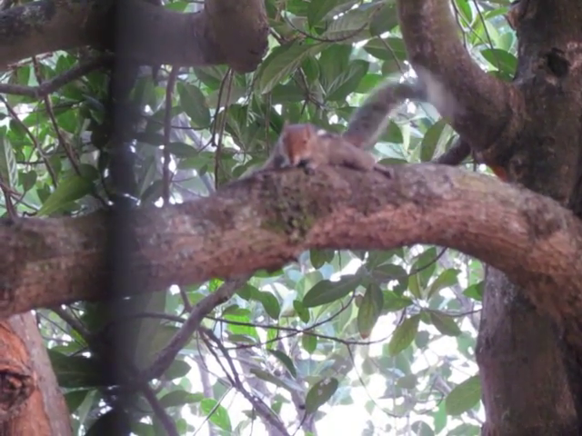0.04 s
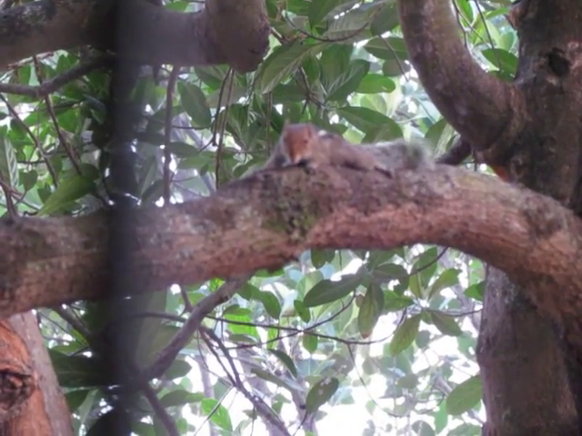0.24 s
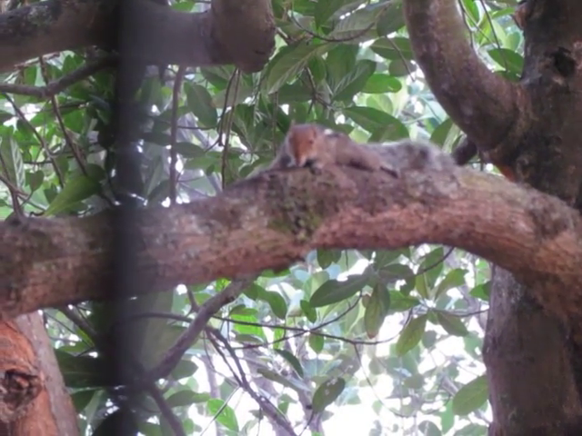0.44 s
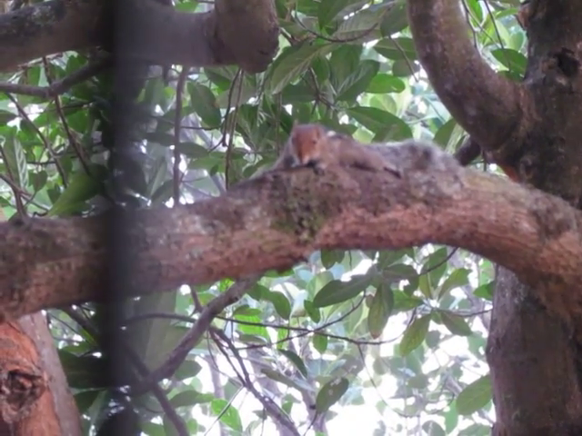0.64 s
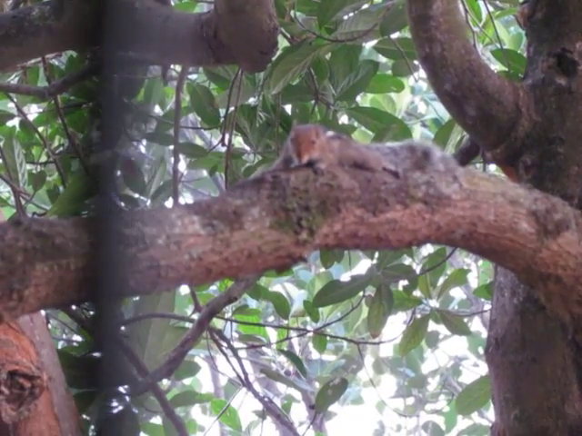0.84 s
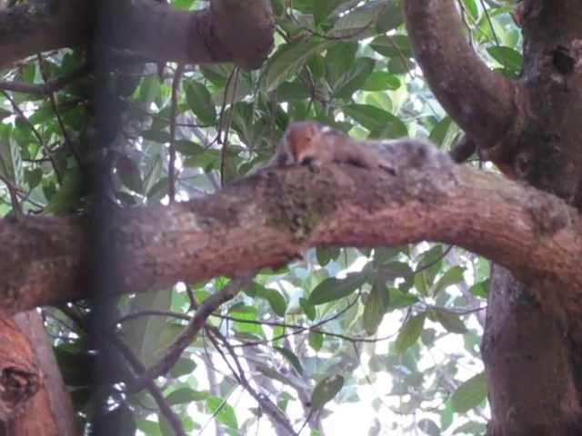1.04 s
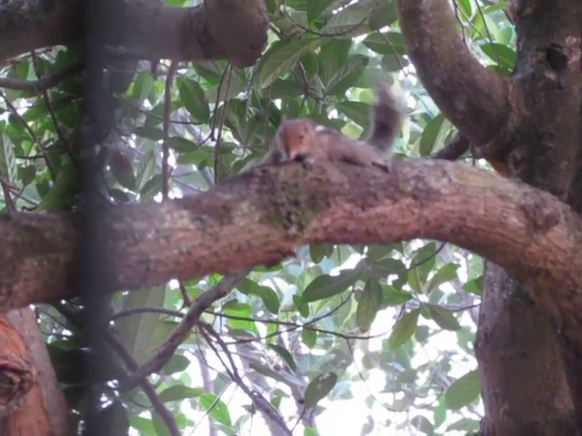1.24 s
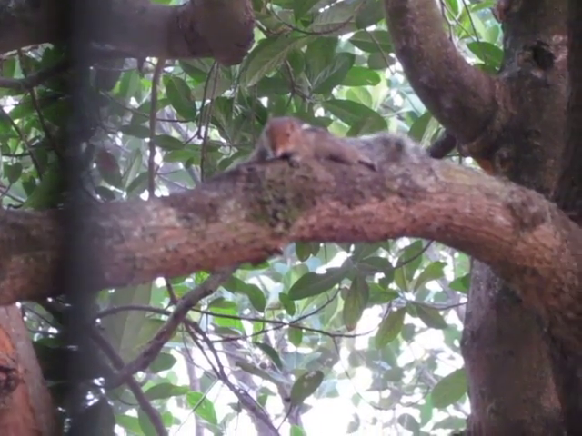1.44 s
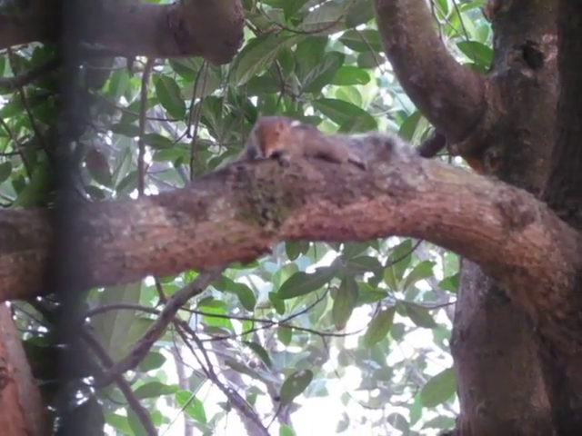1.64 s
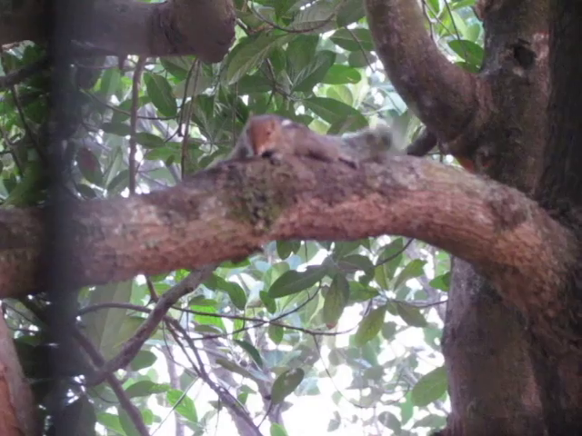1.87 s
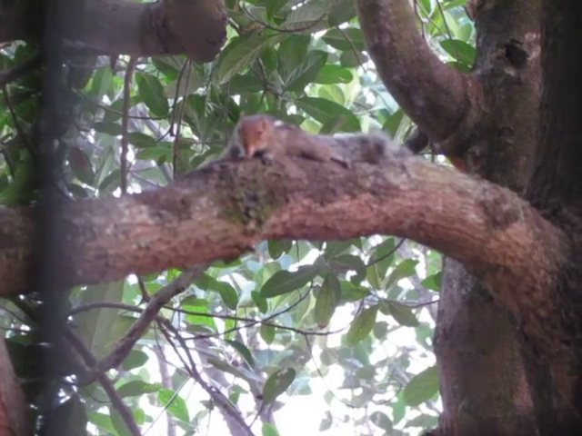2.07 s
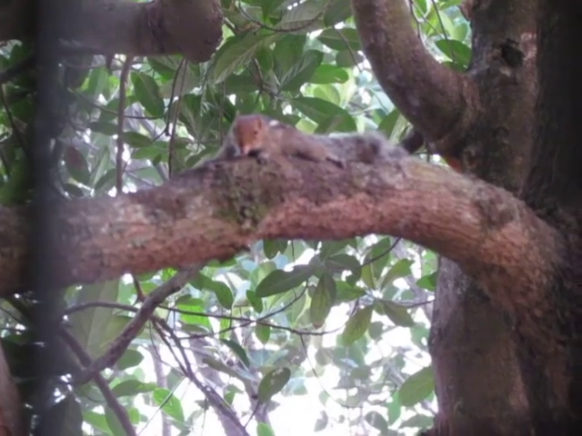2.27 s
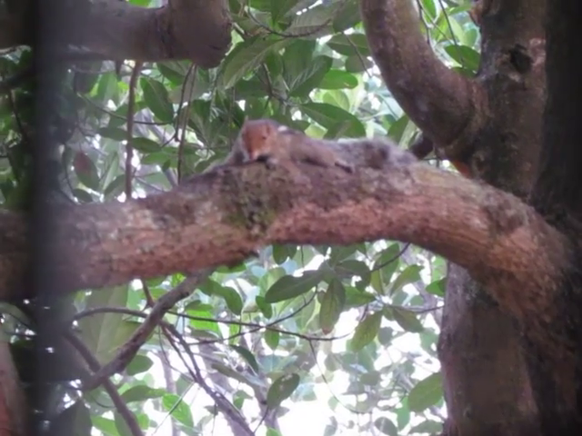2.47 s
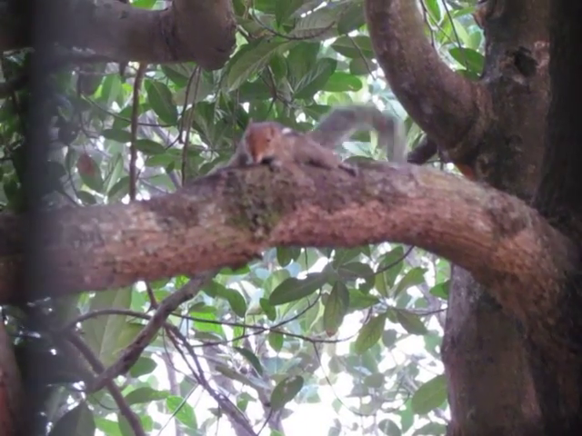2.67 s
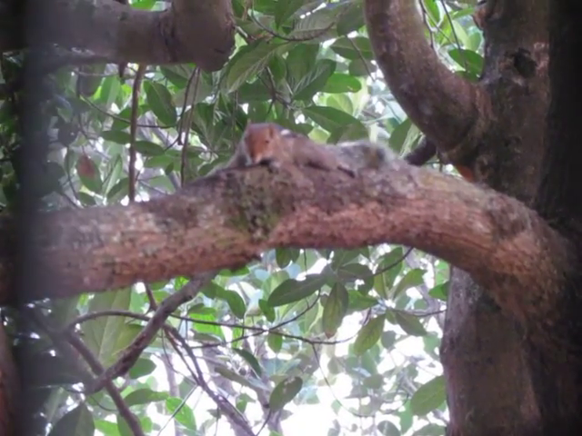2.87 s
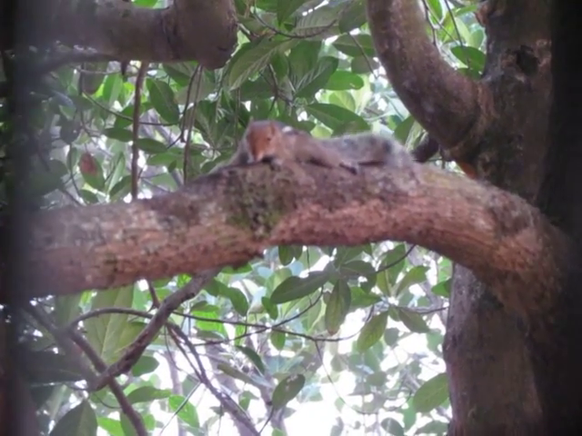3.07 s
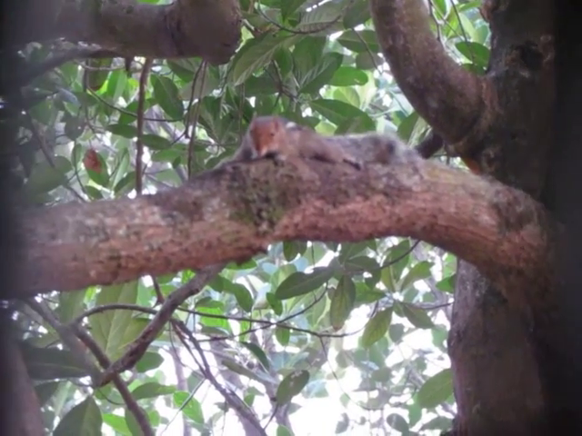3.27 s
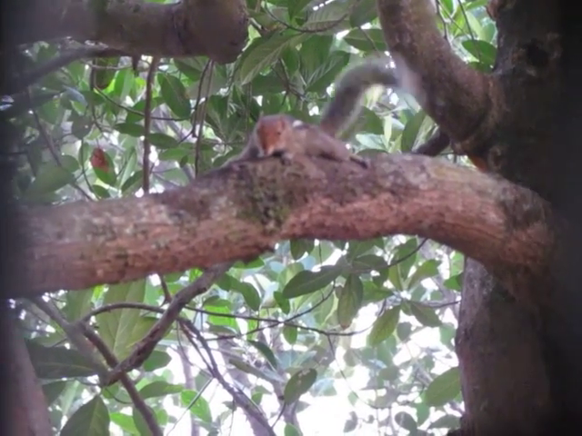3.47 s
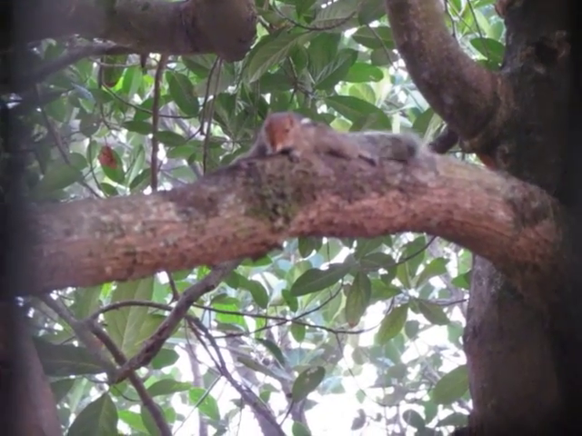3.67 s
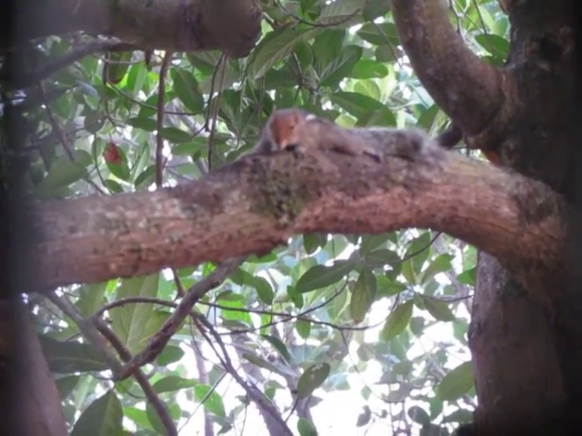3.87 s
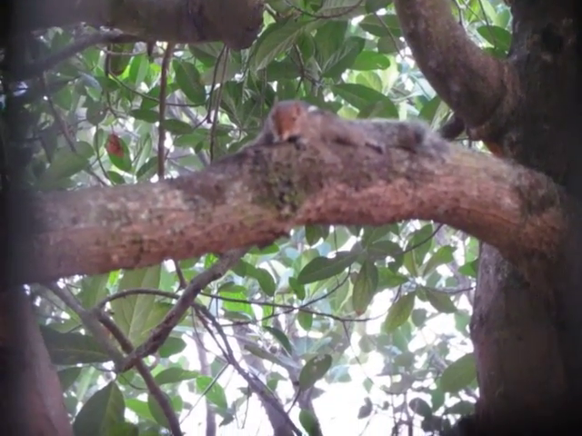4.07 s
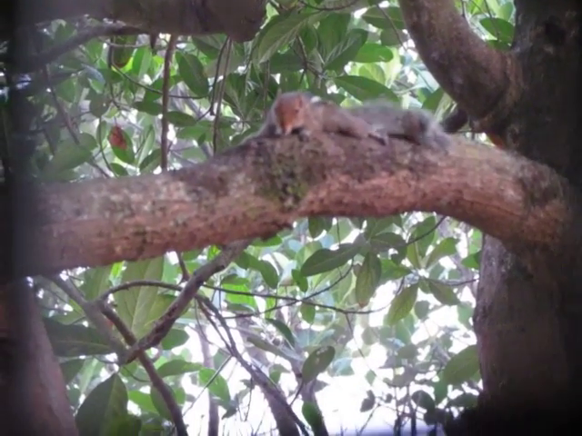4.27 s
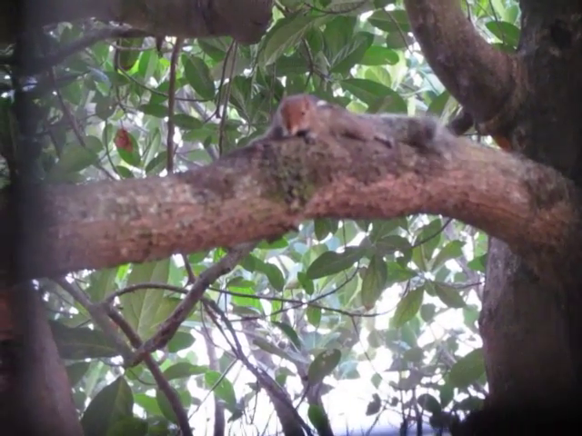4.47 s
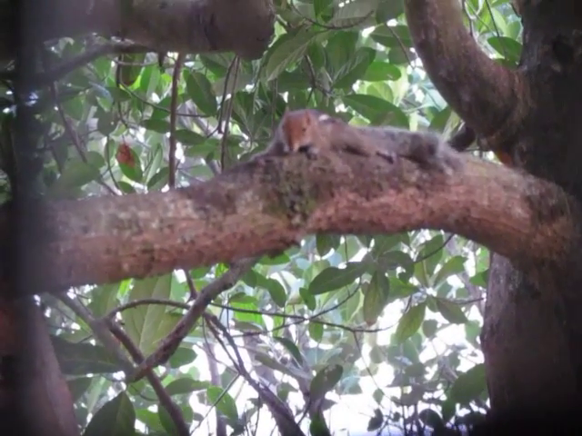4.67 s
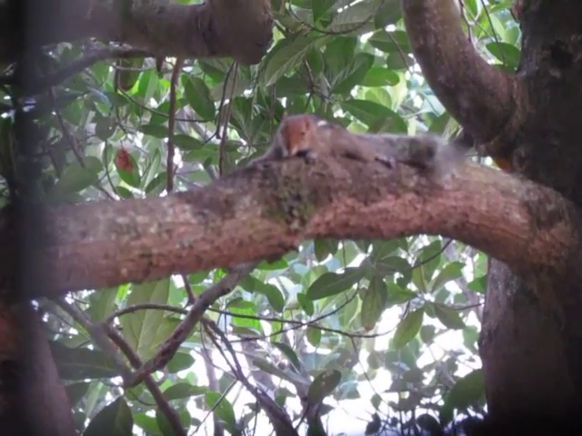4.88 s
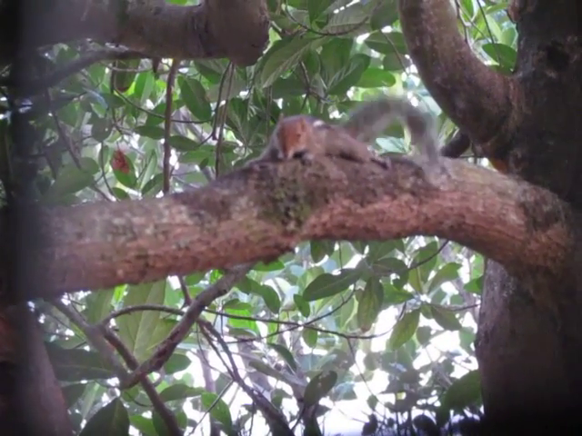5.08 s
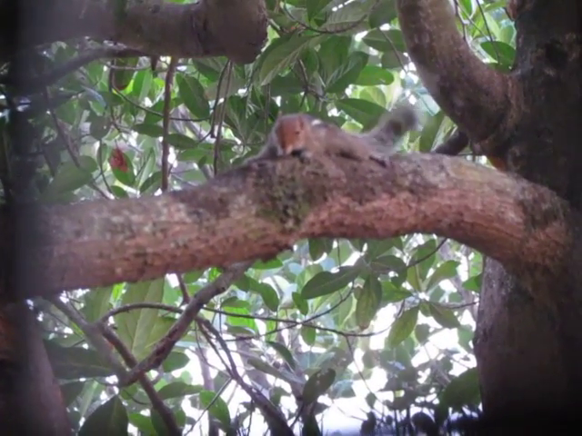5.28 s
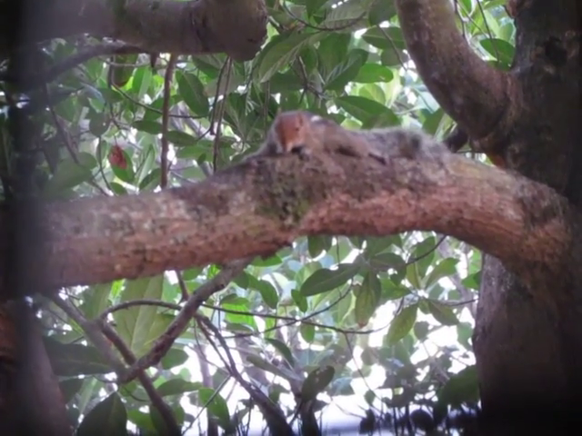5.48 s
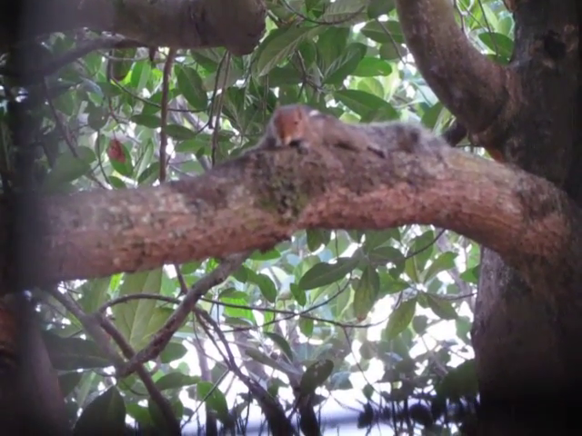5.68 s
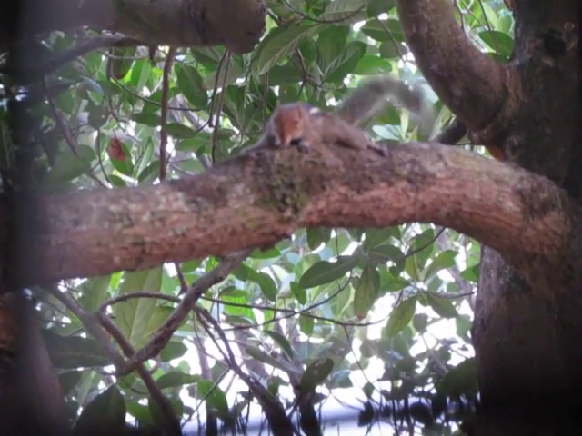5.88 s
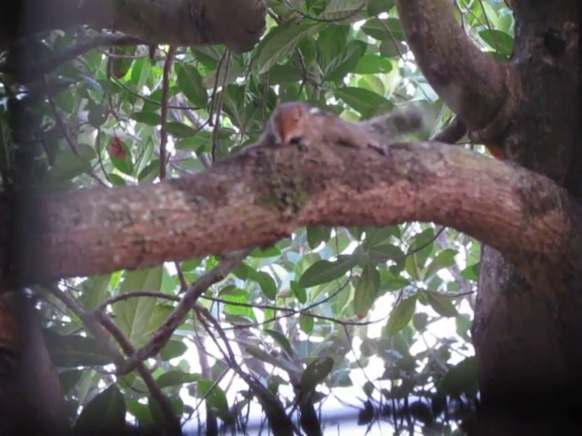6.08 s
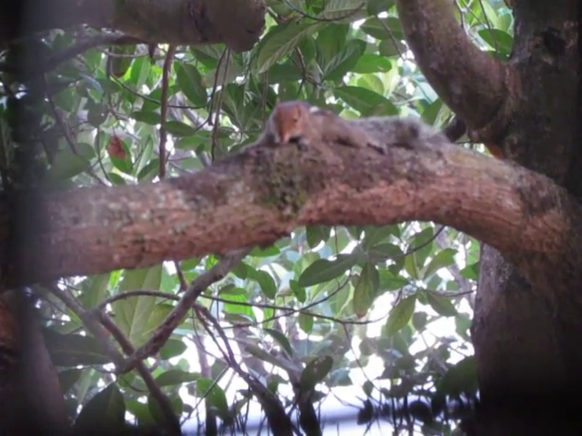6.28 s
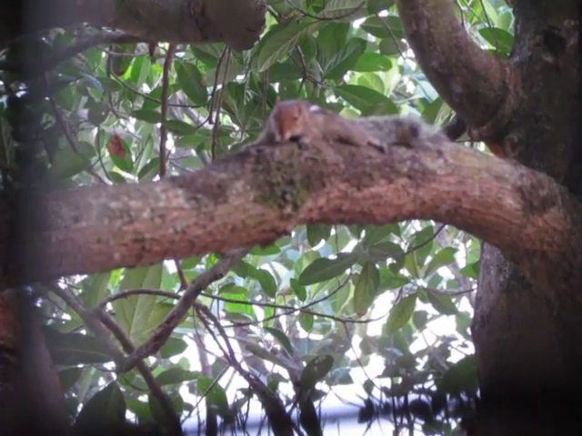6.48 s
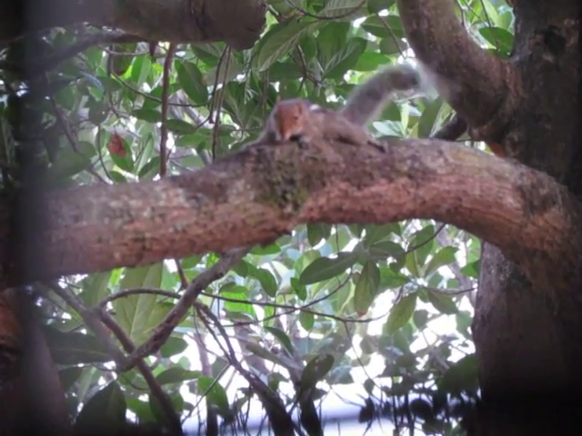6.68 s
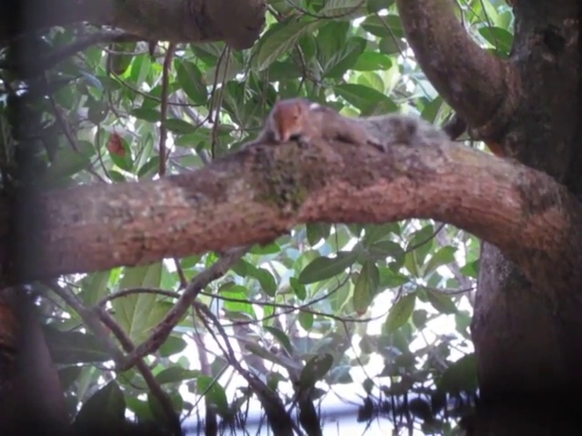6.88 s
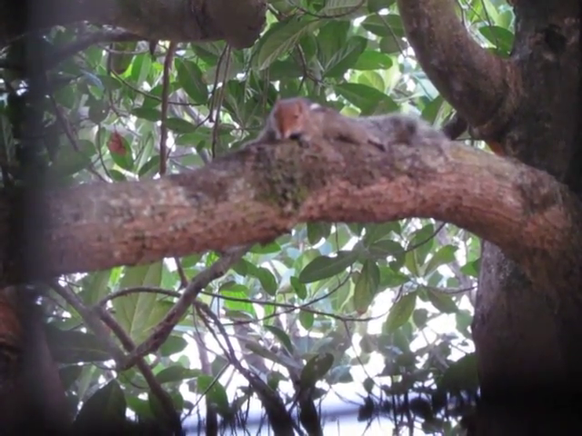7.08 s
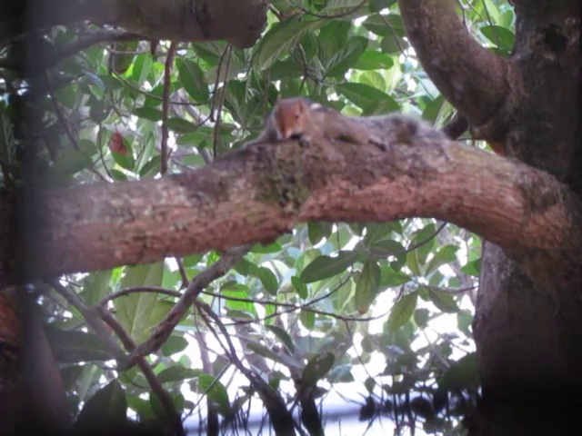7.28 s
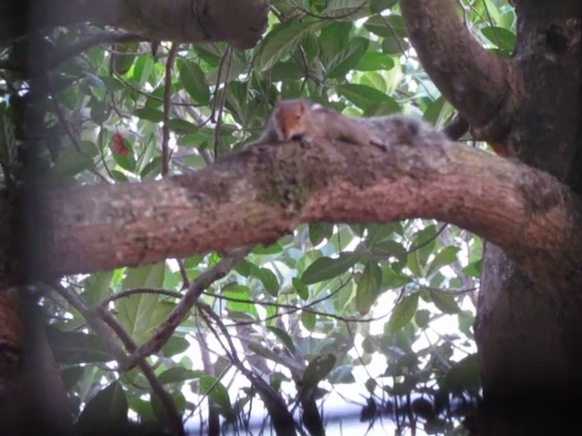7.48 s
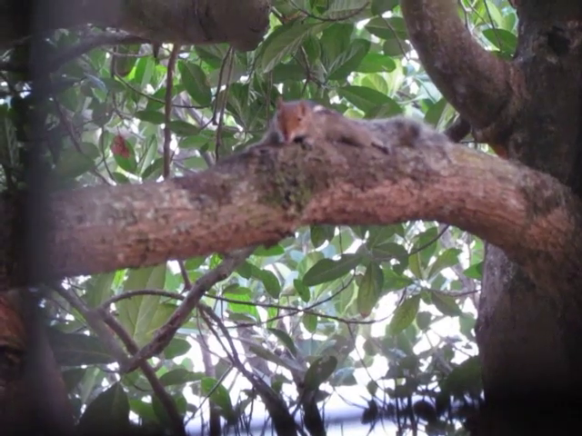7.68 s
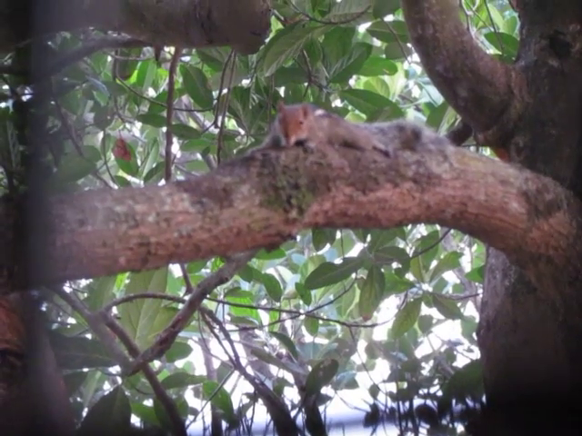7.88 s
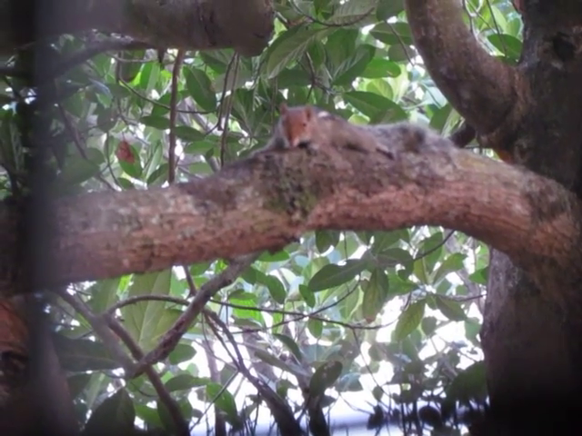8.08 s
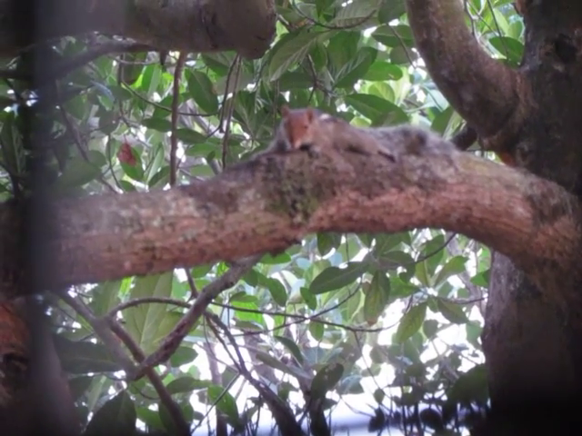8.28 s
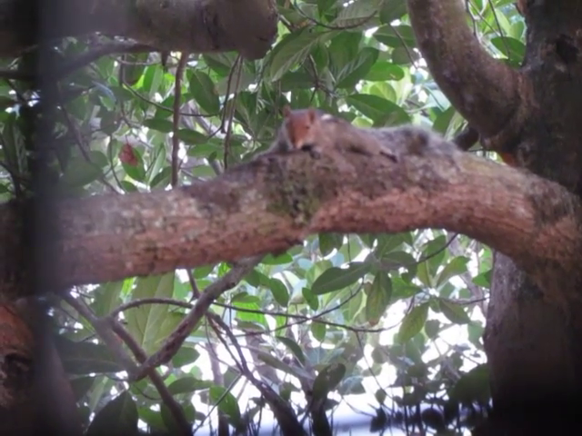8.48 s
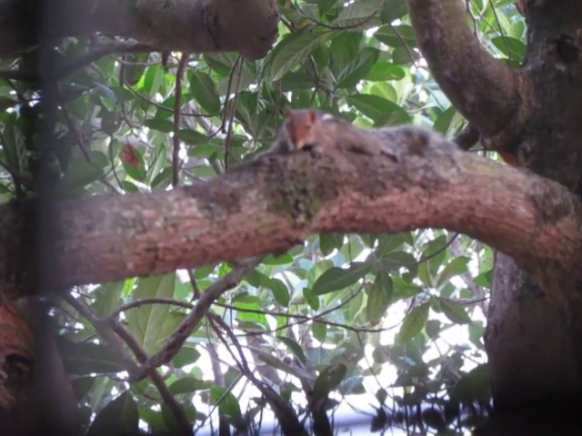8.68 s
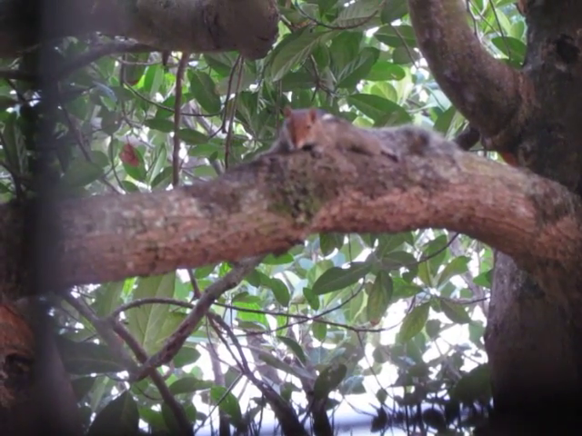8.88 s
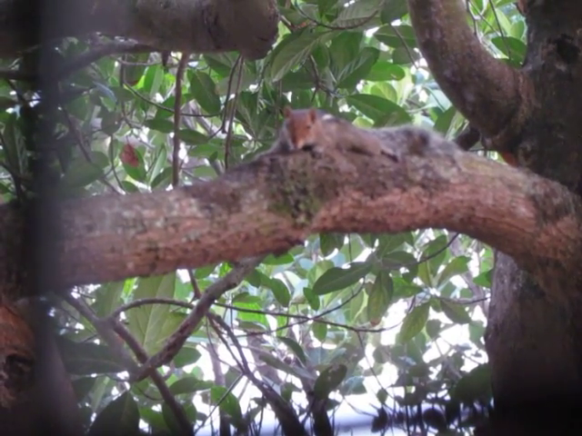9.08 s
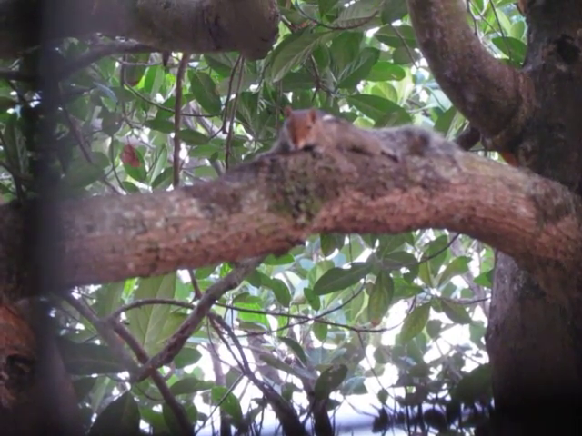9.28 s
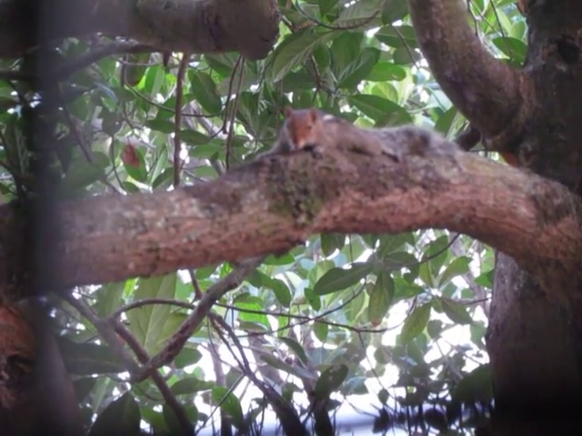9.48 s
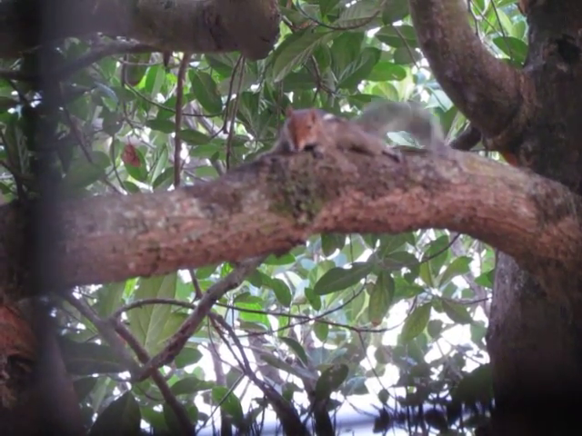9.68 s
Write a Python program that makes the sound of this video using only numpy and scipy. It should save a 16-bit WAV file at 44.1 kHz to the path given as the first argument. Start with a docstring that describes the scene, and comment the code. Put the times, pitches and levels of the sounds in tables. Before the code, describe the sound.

Outdoors among trees, a small animal scolds insistently: hard, bright, downward-swept chips with slightly raspy edges and woodland echo, mixed with little yelps, a few soft grunts and longer whining squeals. Behind are a low rumble, faint hum, distant rising whistles and dull handling-like bumps. After a final run the calls stop for two seconds, small tweets and a light rustle emerge, and a loud squeal ends it. Automatic gain lifts the quiet gap.

```python
"""Scolding squirrel on a branch

A squirrel scolds: chips swept down by about an octave, squeals, and softer yelps, whines and squeaks.
Its voice is a swept harmonic series with rasp; reflections and noise tails scatter it among the trees.
Behind lie far birds (gliding sines), dull bumps, a rustle and a low rumble (shaped noise), and a hum.
The recorder's gain control ducks under the calls and lets the background swell in the long pause."""
import sys
import numpy as np
from scipy import signal
from scipy.fft import rfft, irfft
from scipy.io import wavfile
from scipy.ndimage import uniform_filter1d

SR = 44100
rng = np.random.default_rng(int(sys.argv[2]) if len(sys.argv) > 2 else 0)


def store_wav(level_fs):
    """Save 16-bit WAV to argv[1]."""
    pcm = np.round(np.clip(np.atleast_2d(level_fs), -1, 1) * 32767)
    wavfile.write(sys.argv[1], SR, pcm.T.astype(np.int16))


N = 429093
TIME = np.arange(N) / SR
RUN_IN = SR // 10   # samples before time zero, so that a call already ringing has its echoes
LEAD_S = .002   # a chip's or squeal's tone enters this long before its tabled start


def from_db(db):
    """Decibel law: 20 dB is a tenfold amplitude."""
    return 10 ** (np.asarray(db) / 20)


def rms_one(x):
    """Normalization to unit rms."""
    return x / np.sqrt(np.mean(x ** 2) + 1e-20)


def along(rows, at):
    """Linear interpolation in a two-column table."""
    return np.interp(at, *np.transpose(rows))


def gain_at(spectrum, hz):
    """Spectral envelope: gain from a table of Hz and dB, interpolated over log frequency."""
    points, db = np.transpose(spectrum)
    return from_db(np.interp(np.log(np.maximum(hz, 1)), np.log(points), db))


def add(track, start_s, sound):
    """Superposition: mix a sound into a track, as far as it lies inside."""
    at = round(start_s * SR) + np.arange(len(sound))
    inside = (at >= 0) & (at < len(track))
    track[at[inside]] += sound[inside]


def wander(size, per_s):
    """Random modulation: straight lines between normal random values, per_s of them a second."""
    return np.interp(np.arange(size) * per_s / SR, np.arange(4096), rng.standard_normal(4096))


def correlate(mid, side, alike):
    """Mid-side mixing: two equal, independent noises become left and right of correlation `alike`."""
    return np.sqrt(1 + alike) * mid + np.sqrt(1 - alike) * side * [[1], [-1]]


# Left-right likeness of noise. Each row: frequency in Hz, correlation from 0 to 1.
LIKENESS = [(30, 0.962), (150, 0.956), (500, 0.866), (1000, 0.624), (4000, 0.127), (15000, 0.061)]


def stereo_noise(spectrum):
    """Diffuse-field noise: coloured, alike on both sides in the bass, less so in the treble; rms 1."""
    hz = np.arange(N // 2 + 1) * SR / N
    mid, side = rfft(rng.standard_normal((2, N)))
    both = correlate(mid, side, along(LIKENESS, hz))
    return rms_one(irfft(both * gain_at(spectrum, hz), N))


# Colour of the onset noise. Each row: frequency in Hz, relative density in dB per Hz.
ONSET_NOISE_COLOUR = [(600, -27), (2800, -14.5), (6500, -6), (8300, 7), (10500, -12.5), (15000, -26)]
ONSET_NOISE_EARLY_S, ONSET_NOISE_S, ONSET_NOISE_DB = 0.00478, 0.01064, -13.5   # level against the call's


def onset_noise():
    """Shaped noise: a short, faint noise burst around the onset of each chip and squeal."""
    swell = np.zeros(N)
    for start_s, *_, db in CHIPS + SQUEALS:
        pulse = np.hanning(round(ONSET_NOISE_S * SR))
        add(swell, start_s - ONSET_NOISE_EARLY_S, from_db(db + ONSET_NOISE_DB) * pulse)
    one_side = stereo_noise(ONSET_NOISE_COLOUR)[0]
    return np.pad(swell * one_side, (RUN_IN, 0))


def sweep(top_hz, hold_s, fall_s, low_hz, length_s, rise_s=0.000946, scoop=0.2445):
    """Exponential relaxation: pitch flicks up to a top, holds it and sinks towards low_hz."""
    t = np.arange(round(length_s * SR)) / SR
    pitch = low_hz + (top_hz - low_hz) * np.exp(-np.maximum(t - hold_s, 0) / fall_s)
    return pitch * (1 - scoop * np.exp(-t / rise_s))   # the folds tighten as the call starts


def glide(first_hz, last_hz, length_s, bend):
    """Power-law glide: pitch slides early for a bend under 1, late for one over 1."""
    share = np.linspace(0, 1, round(length_s * SR))
    return first_hz + (last_hz - first_hz) * share ** bend


# Harmonics of the relaxed voice. Each entry: strength in dB, from the first harmonic upward.
HARMONICS_DB = [0, -6, -11, -19, -19, -28]
# Resonance of throat and mouth. Each row: frequency in Hz, relative gain in dB.
THROAT = [(1900, -15.5), (2500, -1), (3200, 0), (4200, -3), (5100, 0), (6500, 3), (8000, -6.5),
          (10000, -8.5), (11500, -13), (13300, -1.5), (15000, -22.5)]


def voice(pitch, shape, jitter=.004, rasp=.045, purity_db=13, easy_hz=3200, low_rasp=.1):
    """Source and filter: an unsteady harmonic series and rasping air, coloured by the throat."""
    size = len(pitch)
    pitch = pitch * (1 + jitter * wander(size, per_s=1300))
    phase = 2 * np.pi * np.cumsum(pitch) / SR
    tension = np.clip(np.log2(pitch / easy_hz), 0, .5)   # tight folds give a purer tone
    tone = np.zeros(size)
    for k, db in enumerate(HARMONICS_DB, 1):
        strength = from_db(db - purity_db * tension * (k - 1.5)) * gain_at(THROAT, k * pitch)
        below_nyquist = k * pitch < SR / 2
        tone += strength * below_nyquist * np.sin(k * phase)
    hz = np.arange(size // 2 + 1) * SR / size
    air = irfft(rfft(rng.standard_normal(size)) * gain_at(THROAT, hz), size)
    high_pass = signal.butter(4, 2400, "high", fs=SR, output="sos")
    air = signal.sosfilt(high_pass, air) + low_rasp * air   # little rasp lies below the tone
    envelope = from_db(along(shape, np.linspace(0, 1, size))) * signal.windows.tukey(size, .04)
    return (tone + rasp * rms_one(air)) * envelope


def utter(calls, shape):
    """Superposition of calls, each a (start in s, level in dB, pitch curve in Hz)."""
    out = np.zeros(RUN_IN + N)
    for start_s, db, pitch in calls:
        add(out, RUN_IN / SR + start_s, from_db(db) * voice(pitch, shape))
    return out


# Chips. Each row: start in seconds, top pitch in Hz, length in seconds, level in dB before the shape.
CHIPS = [ (-0.034, 4511, 0.0514, -17.5), (0.4455, 4584, 0.0523, -19), (1.0712, 4649, 0.0507, -18),
         (1.659, 4448, 0.0495, -18), (2.626, 4363, 0.0428, -18), (2.9933, 4385, 0.0451, -18.5),
         (3.3765, 4566, 0.0564, -19), (3.7704, 4416, 0.0506, -18.5), (4.2327, 4383, 0.053, -19.5),
         (4.6769, 4404, 0.05, -19.5), (5.0048, 4228, 0.042, -18), (5.4609, 4637, 0.0605, -21.5),
         (5.8085, 4257, 0.0428, -18), (6.1687, 4455, 0.0523, -20), (6.588, 4297, 0.0455, -17.5),
         (6.877, 4740, .064, -21)]
# Loudness through a chip or squeal. Each row: share of its length, gain in dB.
HARD_SHAPE = [(0, -28), (.04, -10), (.11, -5), (.21, 1), (.4, 2), (.56, -2), (.8, -6), (1, -20)]
CHIP_HOLD_S, CHIP_LOW_HZ, CHIP_FALL_SHARE = .0068, 1934.3, .36   # fall time as a share of length


def chips():
    """Relaxing folds: each chip holds its top pitch, then sinks towards one low pitch."""
    calls = []
    for start_s, top_hz, length_s, db in CHIPS:
        pitch = sweep(top_hz, LEAD_S + CHIP_HOLD_S, CHIP_FALL_SHARE * length_s, CHIP_LOW_HZ, length_s)
        calls.append((start_s - LEAD_S, db, pitch))
    return utter(calls, HARD_SHAPE)


# Main reflections off branch and trunks. Each row: delay in ms, left gain in dB, right gain in dB.
REFLECTIONS = [(1.852, -19.5, -6), (4.897, -16.5, -9.5), (6.753, 0.5, -2), (7.372, -10, -49)]
TWIG_FIRST_MS, TWIG_LAST_MS, TWIG_DB = 2.2, 14, -8   # random delay range, gain of each
EAR_LAG_MS = 0.1174   # largest lag between left and right for an echo from the side


def near_echoes(x, count=6):
    """Comb filtering: direct sound and early reflections interfere, so every sweep flutters."""
    out, t = np.array([x, x]), np.arange(len(x)) / SR

    def late(ms):
        return np.interp(t - ms / 1000, t, x, left=0)

    for delay_ms, left_db, right_db in REFLECTIONS:
        out += from_db([[left_db], [right_db]]) * late(delay_ms)
    twigs = rng.uniform([TWIG_FIRST_MS, -1], [TWIG_LAST_MS, 1], (count, 2))
    for delay_ms, bearing in twigs:
        out += from_db(TWIG_DB) * np.array([late(delay_ms), late(delay_ms + bearing * EAR_LAG_MS)])
    return out


def scatter(x, t60, level_db, dull_hz, onset_s, alike):
    """Diffuse reverberation: countless echoes from leaves and trunks build up, then die away."""
    t = np.arange(SR) / SR
    mid, side = rng.standard_normal((2, SR))
    decay = from_db(-60 * t / t60)   # 60 dB down after t60 seconds
    build_up = 1 - np.exp(-(t / onset_s) ** 2)
    tail = correlate(mid, side, alike) * decay * build_up
    tail = tail / np.sqrt(np.sum(tail ** 2) / 2)   # unit energy before the treble loss
    tail = signal.sosfilt(signal.butter(2, dull_hz, fs=SR, output="sos"), tail)
    return from_db(level_db) * signal.fftconvolve(x[None], tail, axes=1)[:, :len(x)]


# Colour of rumble and airy hiss. Each row: frequency in Hz, relative density in dB per Hz.
RUMBLE_COLOUR = [(15, -53.5), (25, -14), (129, -1), (198, -5), (340, -12.5), (389, -13.5), (552, -16.5),
                 (2170, -25), (2850, -24.5), (3630, -24), (4040, -25), (4380, -27), (5730, -28.5),
                 (7300, -31), (15500, -43)]
# Rumble and hiss level. Each row: time in seconds, level in dB.
RUMBLE_DB = [(0, -52.5), (4, -53.5), (7, -53), (8.5, -52), (9.7, -48.5)]


def rumble():
    """Shaped noise: distant rumble and the hiss of the air, slowly changing in level."""
    return from_db(along(RUMBLE_DB, TIME)) * stereo_noise(RUMBLE_COLOUR)


# Far machine hum. Each row: frequency in Hz, rms level in dB before it wavers.
HUM = [(145.3, -72.5), (199.6, -63)]


def hum(waver_db=3.0):
    """Amplitude modulation: steady sines whose levels waver at random."""
    out = np.zeros(N)
    for hz, db in HUM:
        level = from_db(db + waver_db * wander(N, per_s=11))
        out += level * np.sqrt(2) * np.sin(2 * np.pi * hz * TIME)
    return out


# Yelps, most just after a chip. Each row: start in seconds, first pitch in Hz, level in dB before the shape.
YELPS = [(0.047, 3805, -24), (1.19, 3754, -26), (3.449, 3118, -23.5), (3.845, 3140, -26),
         (4.303, 3084, -25), (5.096, 3351, -21), (5.891, 3167, -22), (6.253, 3269, -23), (6.958, 3268, -25)]
# Loudness through a yelp, whine or squeak. Each row: share of its length, gain in dB.
SOFT_SHAPE = [(0, -20.5), (.15, -4), (.35, 4), (.65, 1), (.85, 0.5), (1, -32.5)]
# a typical yelp
YELP_START_HZ, YELP_END_HZ, YELP_S, YELP_BEND = 3209.4, 2330.7, .0245, .8
YELP_END_FOLLOWS, YELP_LENGTH_FOLLOWS = 0.2457, 1.531   # powers of the pitch ratio


def yelps():
    """Power-law scaling: a yelp that starts higher also ends higher and lasts longer."""
    calls = []
    for start_s, first_hz, db in YELPS:
        ratio = first_hz / YELP_START_HZ
        last_hz = YELP_END_HZ * ratio ** YELP_END_FOLLOWS
        length_s = YELP_S * ratio ** YELP_LENGTH_FOLLOWS
        calls.append((start_s, db, glide(first_hz, last_hz, length_s, YELP_BEND)))
    return utter(calls, SOFT_SHAPE)


def whistles(notes, waver):
    """Frequency modulation: thin gliding, wavering sines that swell and fade."""
    out = np.zeros(N)
    for start_s, length_s, first_hz, last_hz, db in notes:
        pitch = np.linspace(first_hz, last_hz, round(length_s * SR))
        pitch = pitch * (1 + waver * wander(len(pitch), per_s=323))
        tone = np.sin(2 * np.pi * np.cumsum(pitch) / SR)
        add(out, start_s, from_db(db) * np.hanning(len(pitch)) * tone)
    return out


# Levels of all far birds are peaks before the trees scatter them.
# A far bird's rising whistle. Each row: start in seconds, last pitch in Hz, level in dB.
RISING_WHISTLES = [(0.5, 1331, -78.5), (1.003, 1346, -70), (3.648, 1436, -70.5), (6.114, 1450, -71.5),
                   (7.174, 1417, -74.5)]
WHISTLE_S, WHISTLE_START_HZ = 0.23, 1268
# A small bird's thin falling notes. Each row: start in seconds, first pitch in Hz, level in dB.
TWEETS = [(8.31, 3886, -69.5), (8.72, 4454, -68.5), (8.96, 4233, -63), (9.43, 4781, -71.5)]
TWEET_S, TWEET_END_SHARE = .07, 0.91
# One low hoot. Each row: start in seconds, length in seconds, first and last pitch in Hz, level in dB.
HOOT = [(7.26, 0.2, 800, 849, -72.5)]


def far_birds():
    """Reverberant field alone: distant whistles, heard only through the trees."""
    notes = [(s, WHISTLE_S, WHISTLE_START_HZ, last_hz, db) for s, last_hz, db in RISING_WHISTLES]
    notes += [(s, TWEET_S, hz, TWEET_END_SHARE * hz, db) for s, hz, db in TWEETS]
    notes += HOOT
    dry_notes = whistles(notes, waver=0.0193)
    return scatter(dry_notes, t60=0.6, level_db=11.0, dull_hz=7000, onset_s=0.00094, alike=0.67)


# Squeals. Each row: start in seconds, top pitch in Hz, time held at the top in seconds,
# trough pitch in Hz, length in seconds, level in dB before the shape.
SQUEALS = [(1.914, 5060, 0.00527, 2620, .1, -21.5), (7.538, 4780, .01, 2578, 0.0577, -20.5),
           (9.63, 4530, 0.012, 2373, 0.0552, -16.5)]


def squeals(fall_s=.014):
    """Relaxing folds again: hard sweeps that fall less far and run on into a whine."""
    calls = []
    for start_s, top_hz, hold_s, low_hz, length_s, db in SQUEALS:
        pitch = sweep(top_hz, LEAD_S + hold_s, fall_s, low_hz, length_s)
        calls.append((start_s - LEAD_S, db, pitch))
    return utter(calls, HARD_SHAPE)


# The whine after each squeal. Each row: start in seconds, first and last pitch in Hz,
# length in seconds, level in dB before the shape.
WHINES = [(1.98, 2620, 3228, 0.0522, -33), (7.62, 3560, 3202, .072, -28), (9.678, 2420, 2670, 0.054, -25)]


def whines():
    """Linear glide: a soft call of evenly sliding pitch."""
    calls = [(s, db, glide(first_hz, last_hz, length_s, 1)) for s, first_hz, last_hz, length_s, db in WHINES]
    return utter(calls, SOFT_SHAPE)


# Squeaks that end a whine. Each row: start in seconds, first pitch in Hz, level in dB before the shape.
SQUEAKS = [(2.052, 7520, -37.5), (7.691, 7218, -30.5)]


def squeaks(length_s=.04, last_hz=5094, bend=2.1):
    """Accelerating glide: high squeaks sag slowly and then fast."""
    calls = [(s, db, glide(first_hz, last_hz, length_s, bend)) for s, first_hz, db in SQUEAKS]
    return utter(calls, SOFT_SHAPE)


# Dull bumps. Each row: start in seconds, decay time in seconds, thud and scuff level in dB before the swell.
BUMPS = [(2.589, 0.0434, -56.5, -36), (2.665, 0.046, -42, -84), (4.442, 0.05, -38, -44.5),
         (4.886, 0.12, -50, -51)]
# Colour of the thud, then of the scuff. Each row: frequency in Hz, relative density in dB per Hz.
THUD_COLOUR = [(25, -18.5), (55, 1.5), (120, -6), (300, -13.5), (1000, -26.5), (4000, -65)]
SCUFF_COLOUR = [(150, -5), (600, -14), (1700, -4.5), (4000, -1.5), (8000, -5.5), (15000, -24)]


def bumps():
    """Damped impact: soft knocks, a low thud with a dry scuff on top, decaying exponentially."""
    thud, scuff = np.zeros((2, N))
    t = np.arange(SR // 2) / SR
    for start_s, decay_s, thud_db, scuff_db in BUMPS:
        swell = np.exp(-t / decay_s) * (1 - np.exp(-t / 0.00091))
        add(thud, start_s, from_db(thud_db) * swell)
        add(scuff, start_s, from_db(scuff_db) * swell)
    return thud * stereo_noise(THUD_COLOUR) + scuff * stereo_noise(SCUFF_COLOUR)


# Soft grunts after some yelps. Each row: start in seconds, first pitch in Hz,
# peak level in dB before scattering.
GRUNTS = [(5.125, 1490, -60.5), (5.925, 1305, -58), (6.29, 1099, -63)]


def grunts(length_s=0.0353, end_share=0.671):
    """Irregular vibration: short low falls, roughened by strong random frequency modulation."""
    notes = [(s, length_s, hz, end_share * hz, db) for s, hz, db in GRUNTS]
    dry_notes = whistles(notes, waver=0.078)
    return scatter(dry_notes, t60=0.116, level_db=15.5, dull_hz=5000, onset_s=0.00068, alike=0.96)


# Rustle level. Each row: time in seconds, level in dB.
RUSTLE_DB = [(8.7, -92.5), (9.0, -69), (9.15, -61), (9.36, -67), (9.46, -57), (9.56, -72.5), (9.7, -74.5)]
# Colour of the rustle. Each row: frequency in Hz, relative density in dB per Hz.
RUSTLE_COLOUR = [(2000, -26.5), (5000, -7), (8500, 4), (11500, -2.5), (15000, -18)]


def rustle():
    """Shaped noise: a brief soft rustle, rich in treble."""
    return from_db(along(RUSTLE_DB, TIME)) * stereo_noise(RUSTLE_COLOUR)


def scene():
    """Superposition: the squirrel among its echoes, over the background."""
    calls = onset_noise() + chips() + yelps() + squeals() + whines() + squeaks()
    leaves = scatter(calls, t60=0.2523, level_db=0, dull_hz=10250, onset_s=.013, alike=0.228)
    grove = scatter(calls, t60=0.8794, level_db=-7.5, dull_hz=6630, onset_s=0.02145, alike=0.336)
    heard = (near_echoes(calls) + leaves + grove)[:, RUN_IN:]
    heard = heard * np.minimum(TIME / .004, 1)   # brief fade-in
    return heard + rumble() + hum() + far_birds() + bumps() + grunts() + rustle()


def record(dry, target_db=-14.0, release_db_per_s=3.0, attack_s=0.00506, ceiling=0.565, cutoff_hz=15300):
    """Dynamic compression: gain drops fast on a loud call and creeps up; peaks round, top is cut."""
    power = uniform_filter1d(np.mean(dry ** 2, axis=0), size=600)
    excess_db = 10 * np.log10(np.abs(power) + 1e-12) - target_db
    excess_db[0] = 0   # the gain starts at unity; the held level sinks from there
    recovery_db = release_db_per_s * TIME
    held_db = np.maximum.accumulate(excess_db + recovery_db) - recovery_db   # below 0, the gain exceeds 1
    pole = np.exp(-1 / (attack_s * SR))
    ducked = dry * from_db(-signal.lfilter([1 - pole], [1, -pole], held_db))
    rounded = ducked / (1 + (ducked / ceiling) ** 8) ** (1 / 8)
    return signal.sosfilt(signal.ellip(10, .3, 80, cutoff_hz, fs=SR, output="sos"), rounded)


dry = scene()
out = record(dry)
store_wav(out)
```